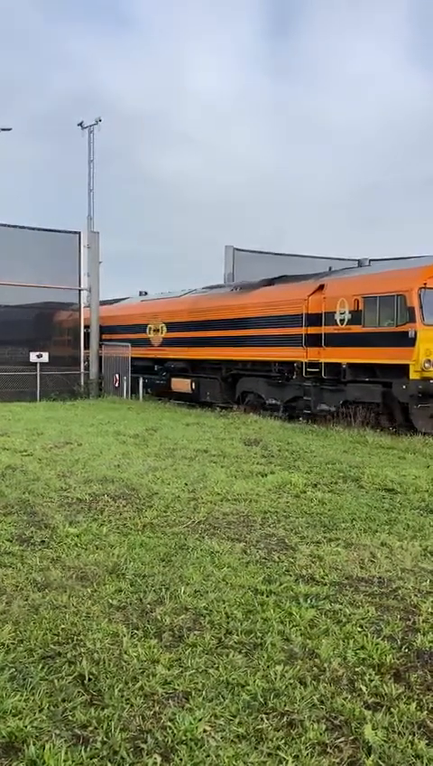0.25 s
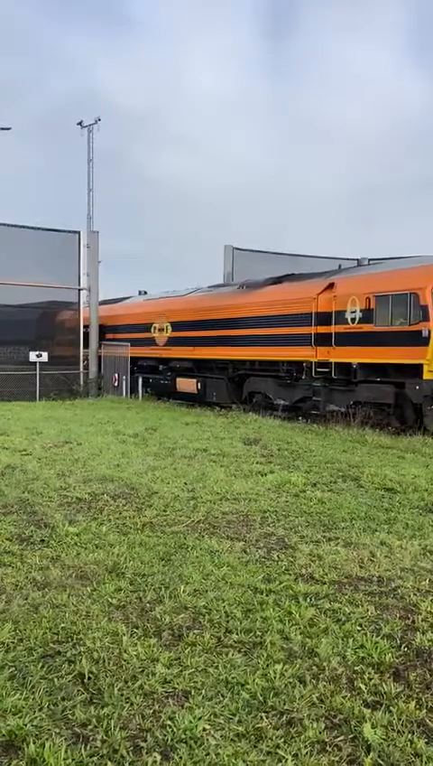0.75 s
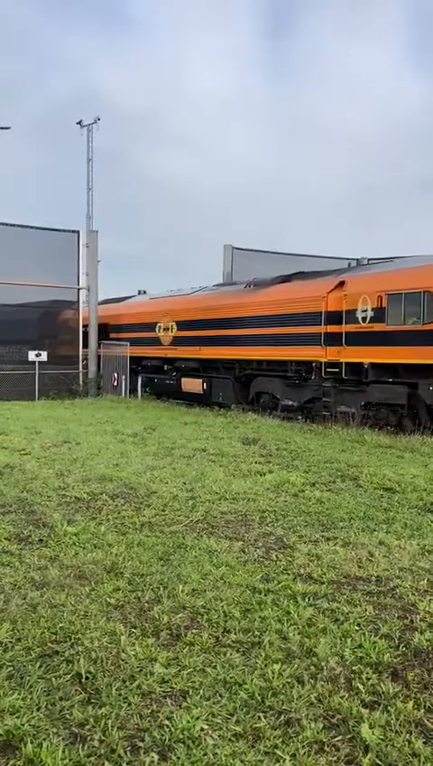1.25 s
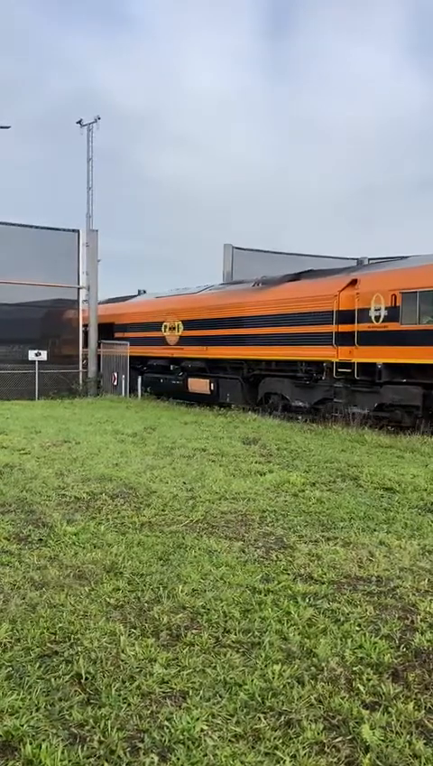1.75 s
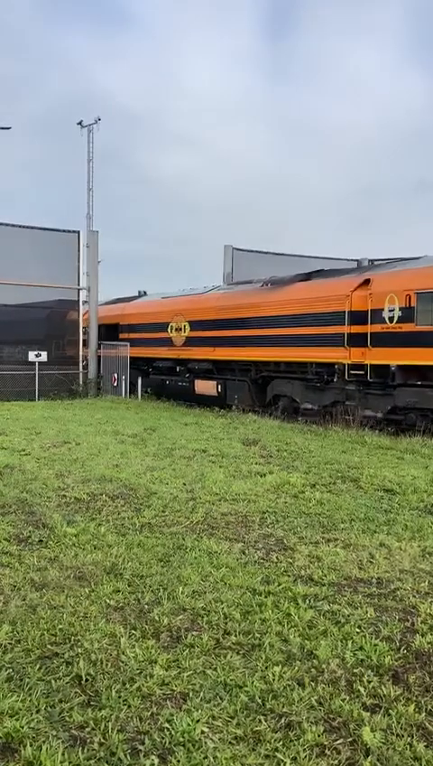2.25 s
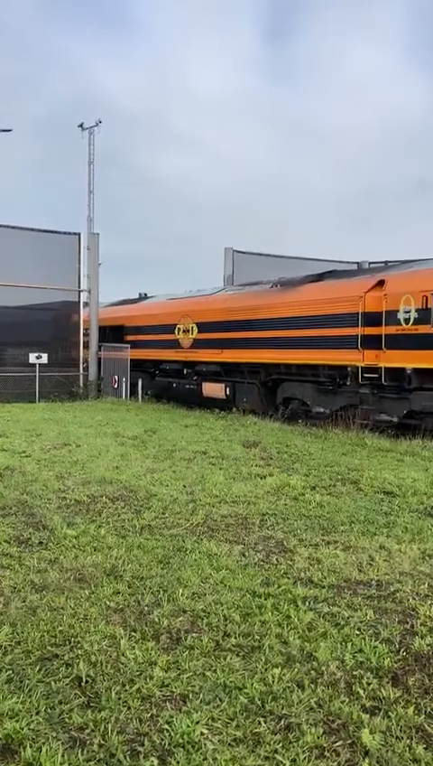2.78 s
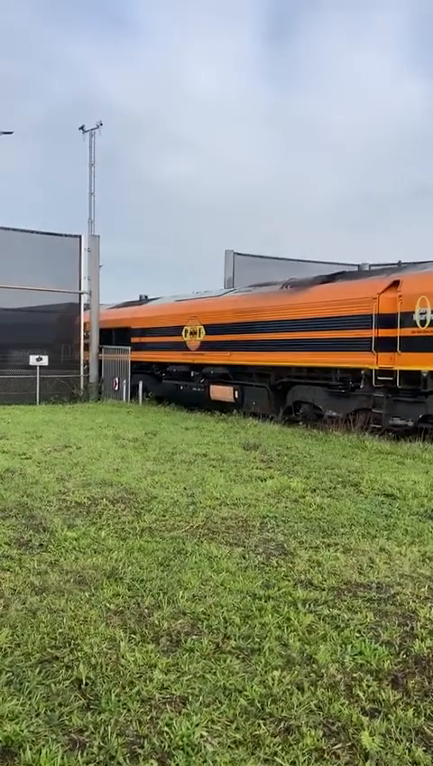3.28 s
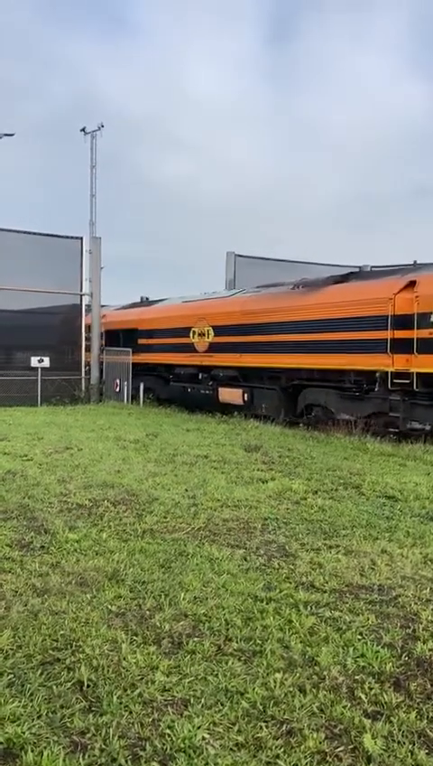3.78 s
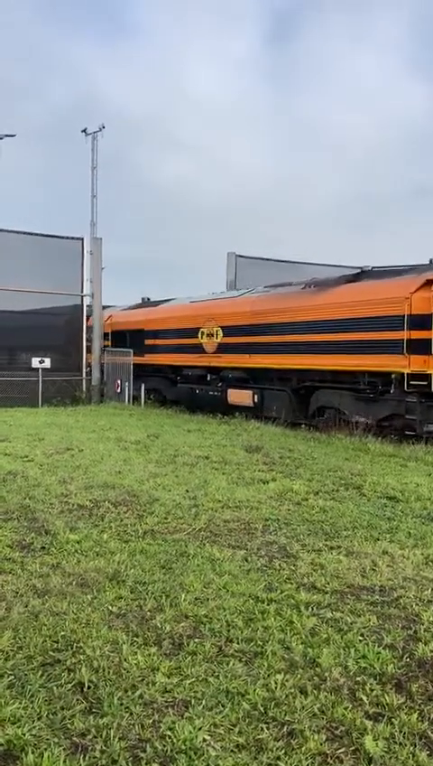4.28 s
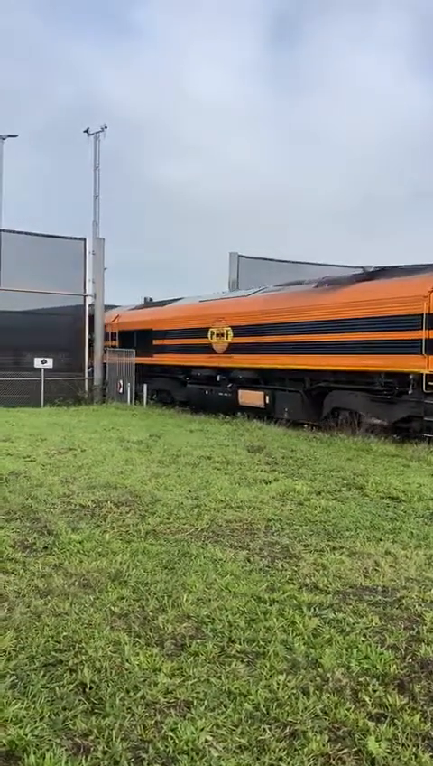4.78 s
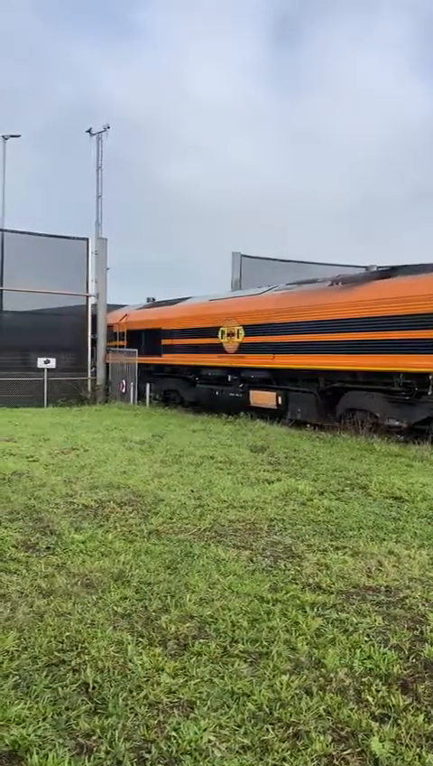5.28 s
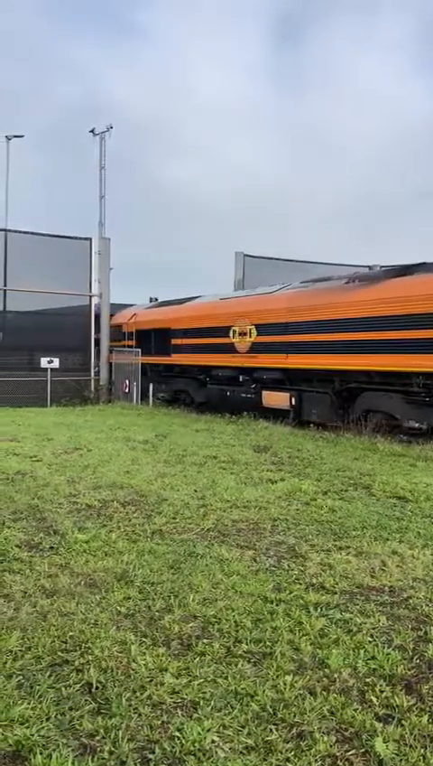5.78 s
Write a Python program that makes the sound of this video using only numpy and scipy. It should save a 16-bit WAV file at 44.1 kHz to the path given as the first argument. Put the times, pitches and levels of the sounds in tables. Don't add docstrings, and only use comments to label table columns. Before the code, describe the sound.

A heavy diesel locomotive throbs slowly past under load, deep pulsing exhaust with whining gears and fans, wind buffets and two short air hisses.

```python
import sys
import numpy as np
from scipy import signal
from scipy.fft import rfft, irfft, next_fast_len
from scipy.io import wavfile
from scipy.ndimage import uniform_filter1d

SR = 44100
rng = np.random.default_rng(int(sys.argv[2]) if len(sys.argv) > 2 else 0)


def voltage_ratio(level):
    return 10 ** (np.asarray(level, float) / 20)


def generate_wav(signal):
    frames = np.transpose(np.atleast_2d(signal))
    scaled = np.clip(frames, -1, 1) * 32767
    pcm = np.round(scaled).astype(np.int16)
    wavfile.write(sys.argv[1], SR, pcm)


N = 265923
SIZE = next_fast_len(N)
HZ = np.maximum(np.arange(SIZE // 2 + 1) * SR / SIZE, 1)
TIME = np.arange(N) / SR

# peak in seconds, half length in seconds, buffeting in dB, tearing in dB.
GUSTS = [(0.116, 0.11, -25, -39), (0.364, 0.21, -51, -29.5), (0.767, 0.27, -31.5, -42),
         (1.182, 0.051, -19, -28), (1.524, 0.22, -32.5, -33.5), (1.917, 0.11, -43, -47),
         (2.047, 0.024, -11, -31), (2.094, 0.037, -41, -20), (2.123, 0.032, -51, -10),
         (2.162, 0.012, -14.5, -32), (2.206, 0.042, -16.5, -24)]
# frequency in Hz, level in dB per Hz.
BUFFET_SPECTRUM = [(22, -36), (38, -4.5), (55, -1), (110, -3.5), (170, -12.5), (300, -41)]
# frequency in Hz, level in dB per Hz.
TEARING_SPECTRUM = [(70, -5), (150, 1), (330, 6.5), (600, 0.5), (1200, -8), (2000, -20.5)]

# frequency in Hz, lead in radians, likeness 0-1, level in dB.
ENGINE_PORTS = [(60, .1, .9, -4), (330, .7, .7, -3), (690, 2.2, .78, -1.5), (1050, 1.55, .5, 0),
                (1500, 1.45, .5, 1), (2100, 1.7, .2, 1.5), (2800, 3.1, .6, 1), (3300, 2.2, .5, 0),
                (3700, 3.3, .6, 0), (4250, 5.2, .4, 0), (4650, np.pi, .93, 0), (6100, np.pi, .94, 0),
                (7000, 1.7, .4, 0), (8000, 0, .99, 0), (9700, 0, .99, 0), (10950, -np.pi, .995, 0)]
# frequency in Hz, lead in radians,
# likeness 0-1, level in dB.
JET_PORTS = [(700, 2.2, .7, -1.5), (1500, 1.5, .5, 1), (2300, 1.5, .3, 2), (2900, 3.1, .8, 0),
             (3600, 2, .5, 0), (4600, 2.1, .5, 0), (5250, np.pi, .92, 0), (6000, np.pi, .94, 0),
             (6900, 1.2, .5, 0), (8000, 0, .99, 0), (9700, 0, .99, 0), (11050, -np.pi, .995, 0)]

# opening in seconds, full flow in seconds, shutting in seconds, peak in dB,
# dying away in dB per second, opening time in seconds.
VALVE_BLASTS = [
    (2.8254, 2.889, 2.929, -23, 101, 0.00033),
    (5.398, 5.574, 5.66, -17, 168, 0.035),
]
# frequency in Hz, level in dB per Hz.
BLAST_SPECTRUM = [(700, -8), (1500, -11), (2300, -5.5), (2900, -10), (4200, -7), (5400, -6), (6700, -4),
                  (7300, -8), (8600, -5.5), (10800, -5), (12000, -6.5)]
# frequency in Hz, level in dB per Hz.
LEAK_SPECTRUM = [(4500, -20), (6200, -15.5), (8800, 10), (10500, -2), (12000, 2)]

# start in seconds, frequency in Hz, level in dB, 60 dB decay in seconds.
CHINKS = [
    (.215, 1700, -29, 0.22),
    (.44, 1730, -29, .1),
    (1.96, 1690, -32, 0.16),
    (1.208, 700, -19, .04),
    (1.734, 654, -19, .04),
    (5.245, 670, -32, 0.036),
]

# frequency in Hz, level in dB per Hz.
CASING_SPECTRUM = [(25, -24), (40, -10), (75, -10), (110, -11), (160, -15), (250, -18), (400, -23),
                   (500, -22), (680, -20), (800, -20), (1000, -22), (1300, -75)]
# frequency in Hz, level in dB per Hz.
AIR_SPECTRUM = [(700, -20), (950, 0), (1500, -6), (2200, -9), (2800, -14), (3750, -16.5), (4500, -22.5),
                (4900, -19.5), (5500, -20.5), (6500, -24.5), (7300, -25.5), (8500, -26), (10000, -35),
                (12000, -37)]
# frequency in Hz, width in Hz, rms level in dB.
DUCTS = [(3400, 500, -46), (3242, 40, -52), (3385, 25, -56), (4180, 170, -54), (7667, 160, -50),
         (8400, 380, -61)]

# frequency in Hz, rms level in dB, fading in dB, pitch blur in Hz.
GENERATOR_TONES = [(1243, -52, 2.5, 1.5), (1292, -47.5, 2, 1.5), (1637, -50, 2.5, 2.5),
                   (1849, -51, 2.5, 2.5), (1911, -55, 3, 3), (3340, -58, 3, 3), (8330, -66, 3, 8)]
# frequency in Hz, rms level in dB, fading in dB, pitch blur in Hz.
TURBO_TONES = [(4118, -54, 3, 5), (4215, -50.5, 2.5, 4), (4264, -57, 3, 5)]
# frequency in Hz, rms level in dB, fading in dB, pitch blur in Hz.
FAN_TONES = [(924, -41, 1.2, 1.8)]
# frequency in Hz, rms level in dB, fading in dB, pitch blur in Hz.
BLOWER_TONES = [(2319, -57, 1.5, 1.2)]
# peak in seconds, half length in seconds, gain in dB.
TURBO_SURGES = [
    (.6, 0.031, 4),
    (1.45, 0.29, 7),
    (3.3, 0.16, -1.5),
    (4.02, 0.44, 13),
    (5.0, 0.13, 12),
    (6.03, 0.14, 16),
]
# peak in seconds, half length in seconds, gain in dB.
FAN_SWELLS = [
    (.5, 0.5, 4.3),
    (2.8, 0.61, 13),
    (3.65, 0.65, 9),
    (5.4, 0.4, 7.3),
    (5.95, 0.38, 13),
]
# peak in seconds, half length in seconds, gain in dB.
BLOWER_SWELLS = [
    (2.45, 0.37, 9),
    (3.1, 0.27, 7.3),
    (3.8, 0.58, 5.3),
    (4.4, 0.46, 16),
    (5.2, 0.33, 4.8),
]

# time in seconds, rms level in dB.
DRIVE_LEVEL = [(0, -65), (.25, -35.5), (.55, -37.5), (.8, -41), (1.08, -35.5), (2, -33), (2.6, -32),
               (3.2, -33.5), (3.6, -31.5), (3.9, -34.5), (4.2, -45), (4.35, -35.5), (4.55, -48),
               (4.75, -34), (5.2, -40.5), (6.03, -45.5)]
# multiple of the crank rate, rms level in dB.
GEAR_ORDERS = [(83, -45), (84, -56.5), (85, -57), (86, -35.5), (87, -39.5), (88, -51.5), (90, -42.5)]

# time in seconds, level in dB.
EFFORT = [(0, -4), (.6, -1.5), (1.2, -1), (1.8, -0.5), (3, -0.2), (4.2, 1), (5.3, 1.5), (6.03, -1.5)]
# crank turns after the throb, low thump in dB, bright crack in dB.
CYLINDERS = [(.01, -7, -1), (.11, -2.5, -9), (.2, -5, -4.5), (.3, 2.5, -9.5), (.39, -2, -3), (.46, -9, 1.5),
             (.57, -7.5, -2), (0.619, -3, -5.5), (.705, -2.5, 2), (.79, -7, -9.5), (.87, -9, 0.5),
             (.93, -2.5, -4.5)]
# multiple of the crank rate, level in dB.
STRONG_ORDERS = [(5, -13), (6, -33.5), (7, -21.5), (9, 3.5), (10, 2.5), (11, -5.5), (12, -5.5), (13, -15),
                 (14, -25.5), (15, -25.5), (16, -13.5), (17, -20), (18, -9.5), (19, -20.5), (24, -23.5),
                 (25, -15.5), (27, -20.5), (28, -15), (30, -13), (32, -16.5), (34, -11), (38, -18.5),
                 (39, -20), (40, -14.5), (41, -19), (47, -14.5), (48, -20.5), (54, -19.5), (55, -24.5),
                 (56, -13), (57, -16.5), (59, -26.5), (60, -17), (63, -13.5), (66, -17), (68, -15.5),
                 (69, -30), (71, -12.5), (72, -20), (73, -20.5), (74, -12.5), (77, -13.5), (78, -12.5),
                 (79, -8), (80, -14), (81, -11.5), (82, -17.5)]


def rms_one(x):
    return x / np.sqrt(np.mean(x ** 2) + 1e-20)


def in_time(rows):
    s, *columns = np.transpose(rows)
    return [np.interp(TIME, s, c) for c in columns]


def at_hz(rows, column=1):
    rows = np.array(rows)
    return np.interp(np.log(HZ), np.log(rows[:, 0]), rows[:, column])


def bump(peak_s, half_s):
    return np.exp(-((TIME - peak_s) / half_s) ** 2)


def swells(rows):
    return sum(gain_db * bump(s, half_s) for s, half_s, gain_db in rows)


def drift(rate, size=1):
    r = np.exp(-80 * np.pi * rate / SR)
    slow = signal.lfilter([1], [1, -2 * r, r * r], rng.standard_normal(N // 40 + 2002))[2000:]
    return np.interp(np.arange(0, N, size) / 40, np.arange(len(slow)), rms_one(slow - slow.mean()))


def noise(spectrum, shared_db, own_db, rate):
    low, high = spectrum[0][0], spectrum[-1][0]
    shape = voltage_ratio(at_hz(spectrum)) * (HZ > low) * (HZ < high)
    coloured = rfft(rng.standard_normal((2, SIZE))) * shape
    place = np.log(HZ / low) / np.log(high / low) * 5
    together = shared_db * drift(rate)
    out = 0
    for k in range(6):
        weight = np.clip(1 - abs(place - k), 0, 1)
        band = irfft(coloured * weight, SIZE)[:, :N]
        out = out + band * voltage_ratio(together + own_db * drift(rate))
    return rms_one(out)


def whines(rows):
    out = np.zeros(N)
    for hz, level_db, fading_db, blur_hz in rows:
        angle = 2 * np.pi * np.cumsum(hz + blur_hz * drift(3.67)) / SR
        out += np.sqrt(2) * voltage_ratio(level_db + fading_db * drift(0.41)) * np.sin(angle)
    return out


def ports(tones, diffuse, table):
    alike = np.clip(at_hz(table, column=2), 0, 1)
    near, other, clear = rfft([diffuse[0], diffuse[1], tones], SIZE)
    turn = voltage_ratio(at_hz(table, column=3)) * np.exp(1j * at_hz(table))
    right = turn * (clear + np.sqrt(alike) * near + np.sqrt(1 - alike) * other)
    return np.array([tones + diffuse[0], irfft(right, SIZE)[:N]])


def wind():
    buffet, tearing = voltage_ratio(-30), 0
    for s, half_s, low_db, high_db in GUSTS:
        buffet = buffet + voltage_ratio(low_db) * bump(s, half_s)
        tearing = tearing + voltage_ratio(high_db) * bump(s, half_s)
    return (buffet * noise(BUFFET_SPECTRUM, shared_db=-2.5, own_db=3.5, rate=4.5)
            + tearing * noise(TEARING_SPECTRUM, shared_db=4.0, own_db=2.0, rate=19.4))


def valve():
    builds_db_per_s, hold_loss_db_per_s = 92, -1
    level = 0
    for opens_s, full_s, shuts_s, peak_db, dying, opening_s in VALVE_BLASTS:
        loss_db = builds_db_per_s * np.maximum(full_s - TIME, 0)
        loss_db += hold_loss_db_per_s * np.maximum(TIME - full_s, 0)
        loss_db += dying * np.maximum(TIME - shuts_s, 0)
        snap_db = 5 * bump(opens_s, .002)
        opening = np.clip((TIME - opens_s) / opening_s, 0, 1)
        level = level + voltage_ratio(peak_db - uniform_filter1d(loss_db, size=1500) + snap_db) * opening
    leak = voltage_ratio(-50.5) * bump(4.3, 2.1) * (TIME > VALVE_BLASTS[0][0])
    return (level * noise(BLAST_SPECTRUM, shared_db=.8, own_db=1.6, rate=22.0)
            + leak * noise(LEAK_SPECTRUM, shared_db=1.1, own_db=1.1, rate=5.0))


def chinks():
    out = np.zeros(N)
    for s, hz, level_db, t60 in CHINKS:
        since = np.clip(TIME - s, 0, 1)
        ring = np.sin(2 * np.pi * hz * since) + .6 * np.sin(2 * np.pi * 1.04 * hz * since)
        out += voltage_ratio(level_db - 60 * since / t60) * np.minimum(since / .003, 1) * ring
    return out


def crank(lag_turns=0):
    crank_hz, first_throb_turns = 8.175, .552
    overspeed_hz, settle_s = .09, .95
    turns = crank_hz * TIME + overspeed_hz * settle_s * (1 - np.exp(-TIME / settle_s))
    return 2 * np.pi * (turns - first_throb_turns - lag_turns)


def casing(effort_db, knock):
    level_db = -27.5 + 0.11 * effort_db
    return voltage_ratio(level_db + 1 * knock) * noise(CASING_SPECTRUM, shared_db=1.1, own_db=-2.5, rate=8.5)


def cooling_air(effort_db, knock):
    level_db = -32.5 + 0.13 * effort_db
    return voltage_ratio(level_db + .4 * knock) * noise(AIR_SPECTRUM, shared_db=.7, own_db=1.5, rate=10.0)


def ducts(effort_db):
    out = np.zeros((2, N))
    for hz, width_hz, level_db in DUCTS:
        peak = 1 / (1 + ((HZ - hz) / width_hz * 2) ** 2)
        ringing = irfft(rfft(rng.standard_normal((2, SIZE))) * peak, SIZE)[:, :N]
        out += voltage_ratio(level_db + 0.65 * drift(1.2)) * rms_one(ringing)
    return voltage_ratio(0.64 * effort_db + 3.0) * out


def rotor_whines(knock):
    generator = voltage_ratio(2.0 * knock) * whines(GENERATOR_TONES)
    blower = voltage_ratio(swells(BLOWER_SWELLS)) * whines(BLOWER_TONES)
    turbo = voltage_ratio(-4 + swells(TURBO_SURGES)) * whines(TURBO_TONES)
    fan = voltage_ratio(-6 + swells(FAN_SWELLS)) * whines(FAN_TONES)
    return generator + blower + turbo + fan


def drive():
    level_db, = in_time(DRIVE_LEVEL)
    level = np.sqrt(2) * voltage_ratio(level_db + 1.0 + 2.66 * drift(7.7))
    wander = 2 * np.pi * np.cumsum(1.08 * drift(4.5)) / SR
    return level * np.sin(117.2 * crank() + wander)


def high_dip_db():
    dip_s, dip_db, back_db_per_s = 3.5, -8.5, 21.5
    since_s = TIME - dip_s
    return np.clip(since_s / .05, 0, 1) * np.minimum(dip_db + back_db_per_s * since_s, 3)


def gear_train():
    abreast_s, peak_db, loss_db_per_s2 = 2.95, 4, 1.5
    angle = crank(lag_turns=.75)
    rattle = 0
    for order, level_db in GEAR_ORDERS:
        level = np.sqrt(2) * voltage_ratio(level_db + 1.0 * drift(0.8))
        rattle = rattle + level * np.sin(order * angle + 0.58 * drift(0.72))
    beam_db = peak_db - loss_db_per_s2 * (TIME - abreast_s) ** 2
    return voltage_ratio(beam_db + high_dip_db()) * rattle


def bark():
    after_throb_turns, length_turns = .708, 0.016
    off_turns = (crank(after_throb_turns) / (2 * np.pi) + .5) % 1 - .5
    pulse = np.exp(-(off_turns / length_turns) ** 2)
    return voltage_ratio(-4.5 + 0.63 * drift(5.2)) * (pulse - uniform_filter1d(pulse, size=400))


def order_db(order):
    weak_db = -25 + 1 * rng.standard_normal()
    return dict(STRONG_ORDERS).get(order, weak_db if order > 4 else -45)


def firing_phase(order):
    turns, low_db, high_db = np.transpose(CYLINDERS)
    bright = np.clip(np.log(order / 25) / np.log(3), 0, 1)
    pulses = voltage_ratio(low_db + bright * (high_db - low_db)) * np.exp(-2j * np.pi * order * turns)
    return np.pi / 2 + np.angle(np.sum(pulses))


def exhaust(rough_db, wander_rad):
    out, angle = 0, crank()[::8]
    dip_db = 0.29 * high_dip_db()[::8]
    for order in range(1, 83):
        if order <= 14:
            start = np.interp(order, [8, 9, 10, 11, 12, 14], [np.pi, 0, 0, -1, -.7, 1.8])
        else:
            start = firing_phase(order)
        loose = np.clip(abs(order - 9.5) / 4, .15, 1)
        level_db = order_db(order) + loose * rough_db * drift(1.0, size=8) + (order > 76) * dip_db
        phase = order * angle + start + loose * wander_rad * drift(0.58, size=8)
        out = out + voltage_ratio(level_db) * np.sin(phase)
    return rms_one(signal.resample_poly(out, 8, 1)[:N])


def scene():
    effort_db, = in_time(EFFORT)
    knock = np.cos(crank(lag_turns=-0.39))
    roar = casing(effort_db, knock) + cooling_air(effort_db, knock) + ducts(effort_db)
    machinery = rotor_whines(knock) + chinks() + drive() + gear_train()
    throb = voltage_ratio(-17.5 + effort_db) * (exhaust(rough_db=3.0, wander_rad=0.27) + bark())
    engine = ports(throb + machinery, roar, ENGINE_PORTS)
    jet = ports(np.zeros(N), valve(), JET_PORTS)
    return engine + jet + wind()


def gain_control(x):
    threshold_db, share, attack_s, release_db_per_s = -20.5, 0.35, 0.2, 17
    heard = signal.sosfilt(signal.butter(2, 198, "high", fs=SR, output="sos"), x[0])
    power_db = 10 * np.log10(uniform_filter1d(heard ** 2, size=2048) + 1e-12)
    over_db = np.maximum(power_db - threshold_db, 0)
    release_db = release_db_per_s * TIME
    held_db = np.maximum.accumulate(over_db + release_db) - release_db
    r = np.exp(-1 / (attack_s * SR))
    return x * voltage_ratio(-share * signal.lfilter([1 - r], [1, -r], held_db))


def wind_guard(x):
    edge_hz, eases_s, octaves_per_s, off_s = 763, 3.09, 1.68, 4.98
    cut_s, cut_half_s, cut_db, cut_hz = 1.4, 0.042, -8, 110
    hz, s, (left, right) = signal.stft(x, SR, nperseg=2048)
    sliding_hz = edge_hz * 2 ** (-octaves_per_s * np.maximum(s - eases_s, 0))
    edge = np.where(s < off_s, sliding_hz, 5)
    stereo = np.clip(np.log(np.maximum(hz, 1)[:, None] / edge) / 0.89 + .5, 0, 1) ** 2
    gust = np.exp(-((s - cut_s) / cut_half_s) ** 2)
    cut = voltage_ratio(cut_db * gust / (1 + (hz[:, None] / cut_hz) ** 4))
    return signal.istft(cut * [left, left + stereo * (right - left)], SR, nperseg=2048)[1][:, :N]


def band_limit(x):
    return signal.sosfilt(signal.butter(12, 11900, fs=SR, output="sos"), x)


def record(dry):
    guarded = wind_guard(gain_control(dry))
    guarded = guarded * np.minimum(TIME / .004, 1)
    mix = 1.2 * np.tanh(guarded / 1.2)
    return band_limit(mix)


dry = scene()
out = record(dry)
generate_wav(out)
```